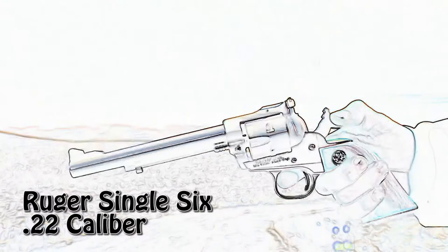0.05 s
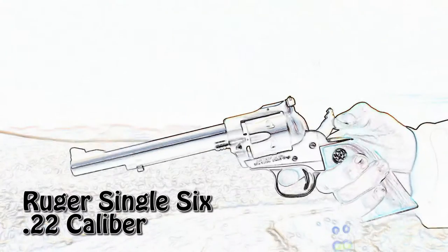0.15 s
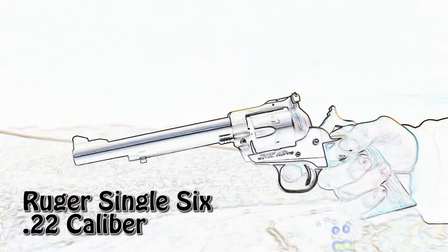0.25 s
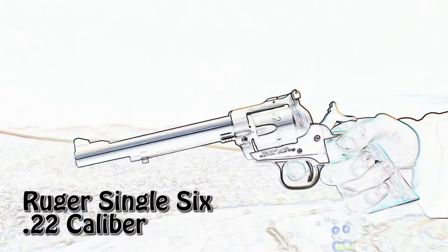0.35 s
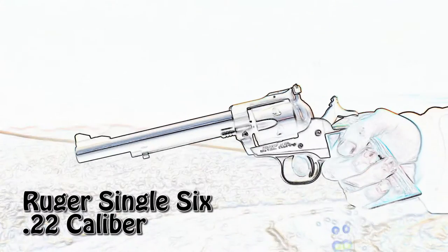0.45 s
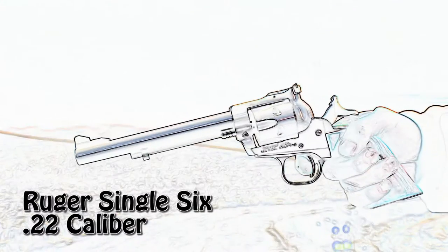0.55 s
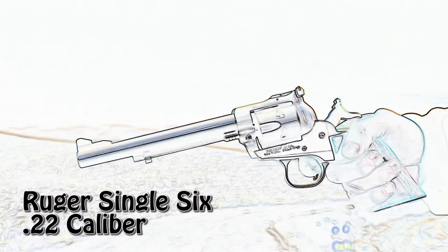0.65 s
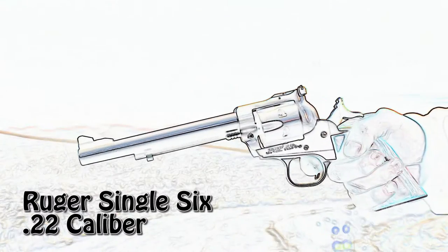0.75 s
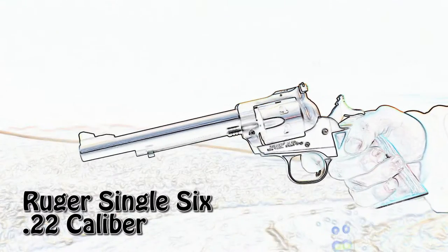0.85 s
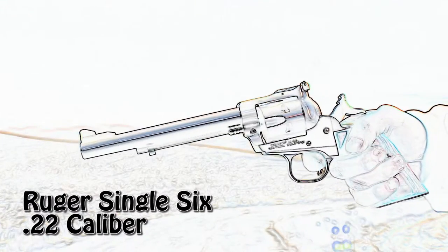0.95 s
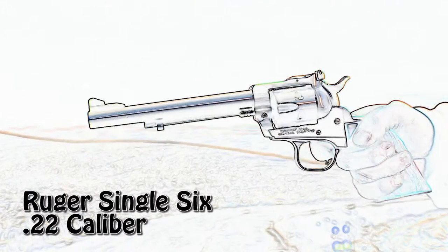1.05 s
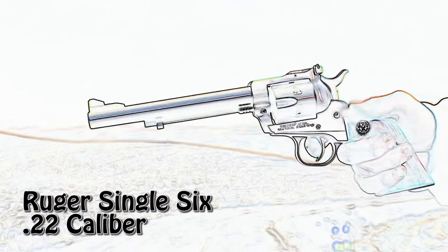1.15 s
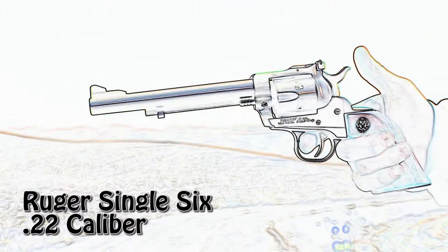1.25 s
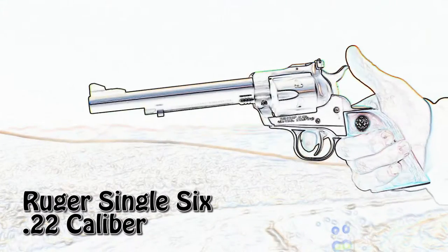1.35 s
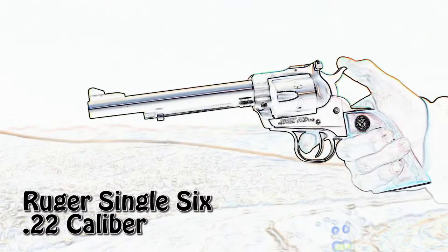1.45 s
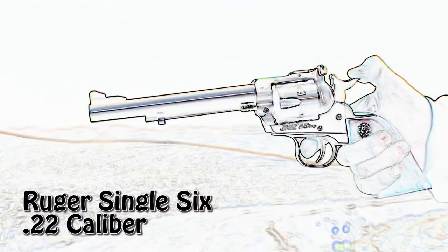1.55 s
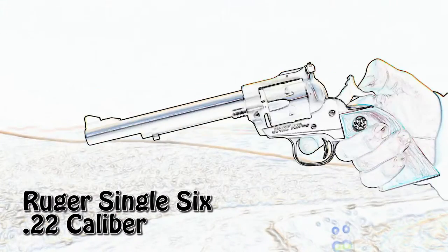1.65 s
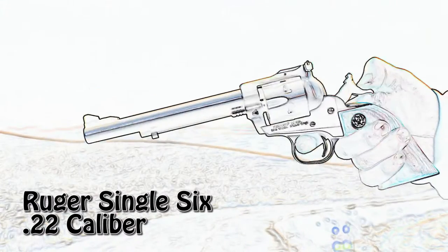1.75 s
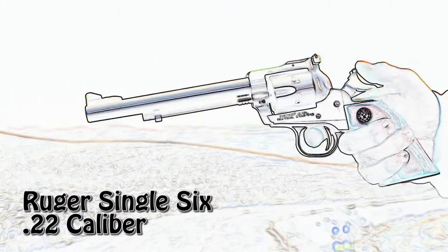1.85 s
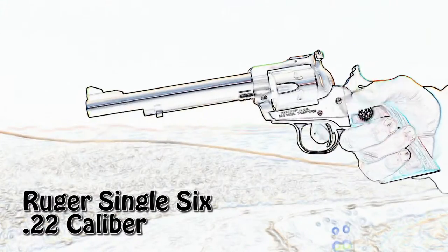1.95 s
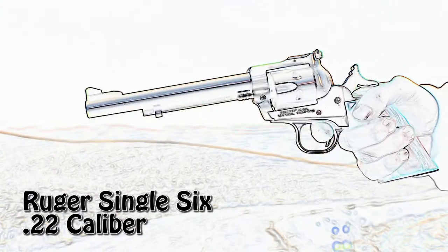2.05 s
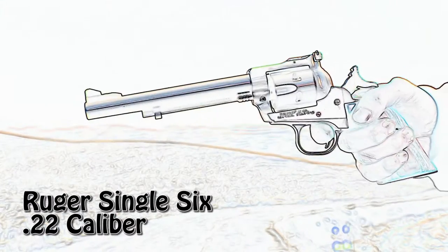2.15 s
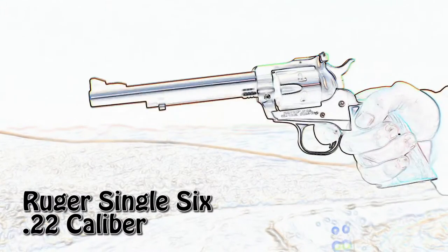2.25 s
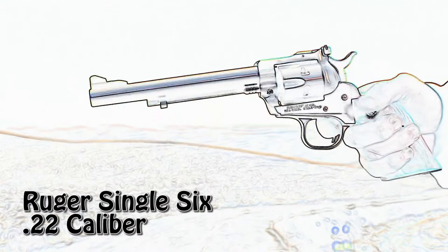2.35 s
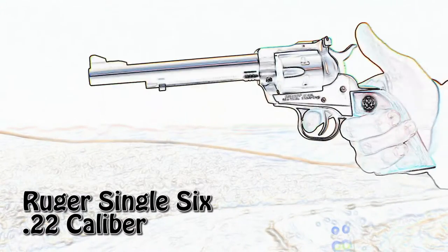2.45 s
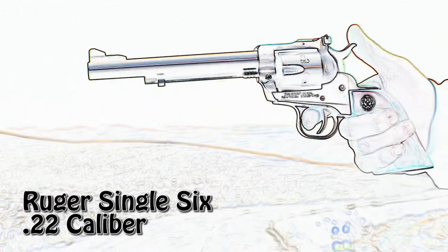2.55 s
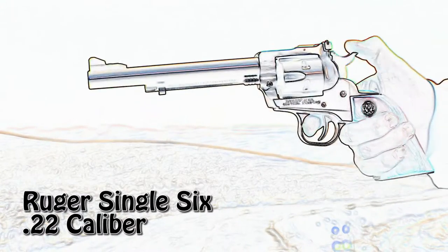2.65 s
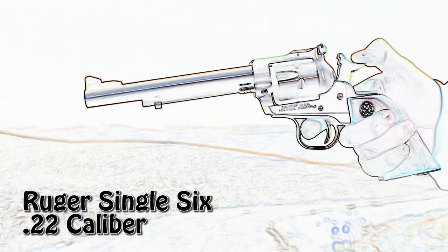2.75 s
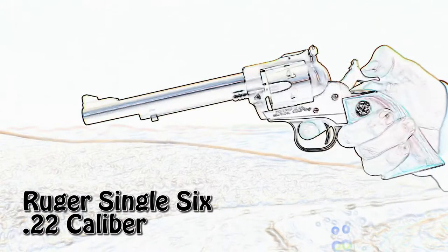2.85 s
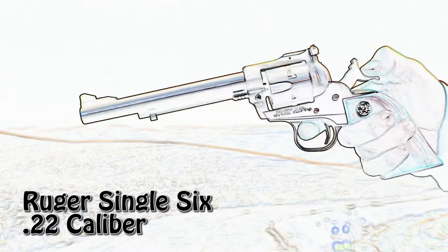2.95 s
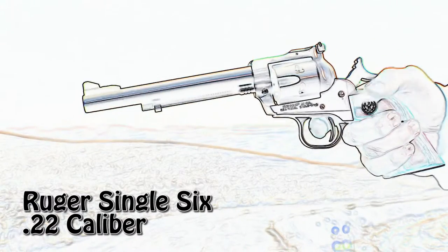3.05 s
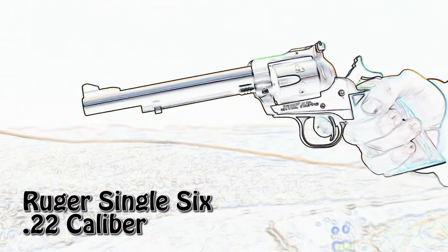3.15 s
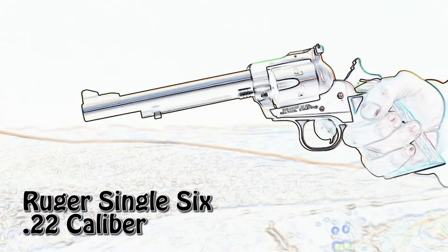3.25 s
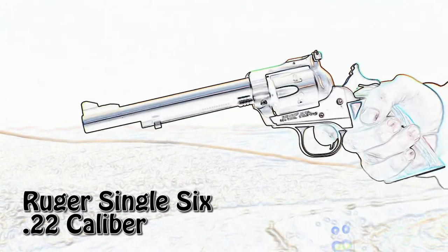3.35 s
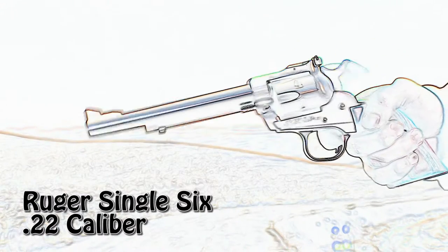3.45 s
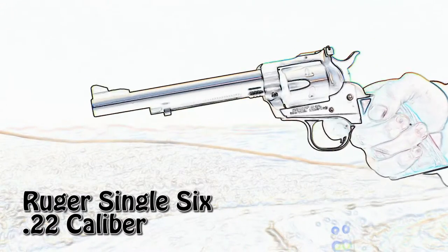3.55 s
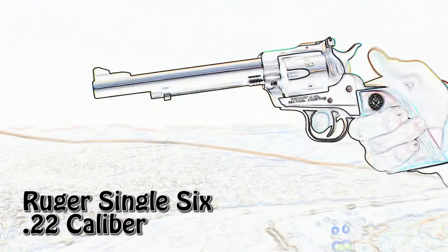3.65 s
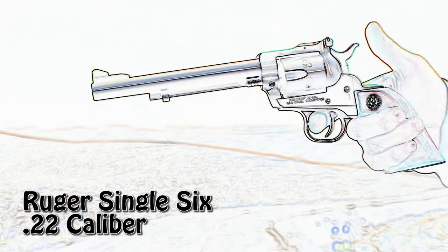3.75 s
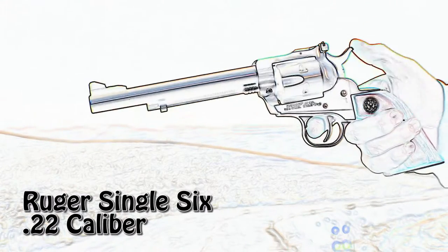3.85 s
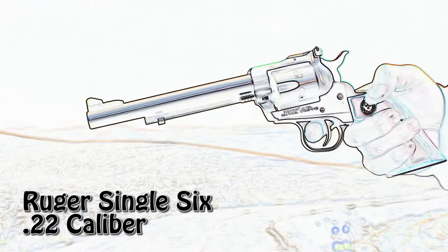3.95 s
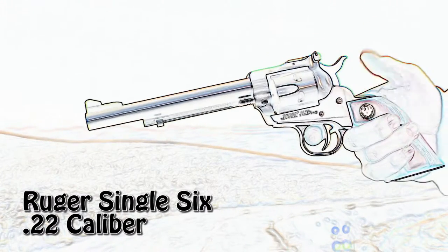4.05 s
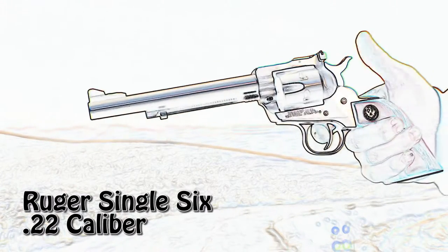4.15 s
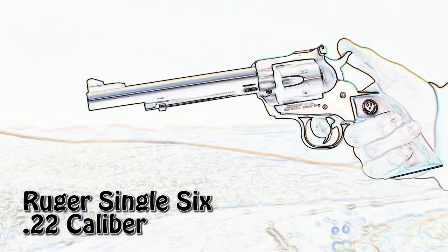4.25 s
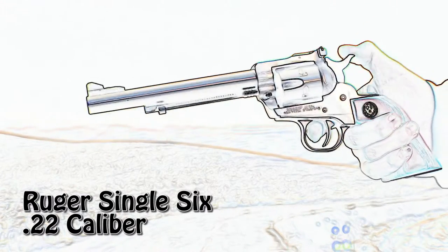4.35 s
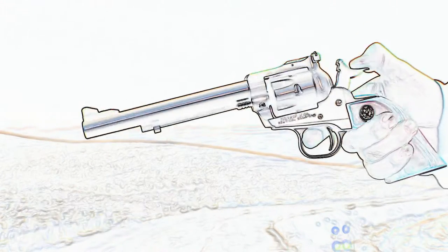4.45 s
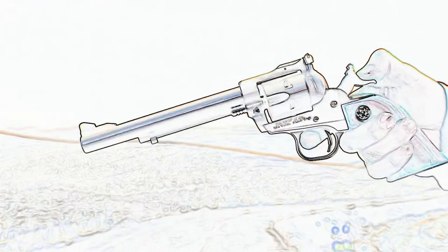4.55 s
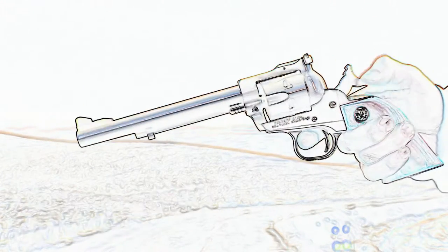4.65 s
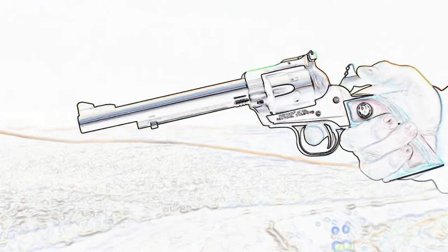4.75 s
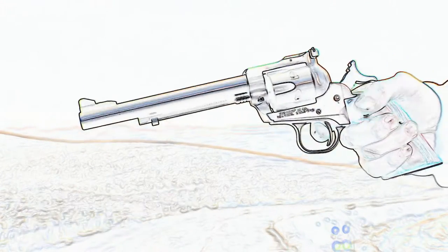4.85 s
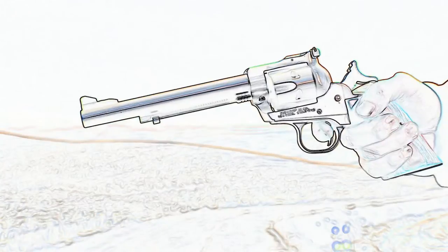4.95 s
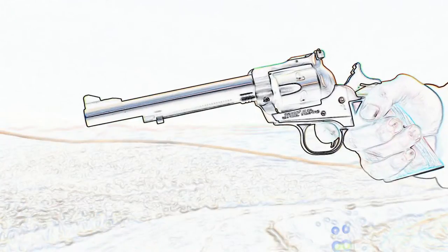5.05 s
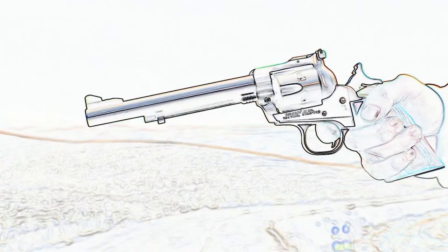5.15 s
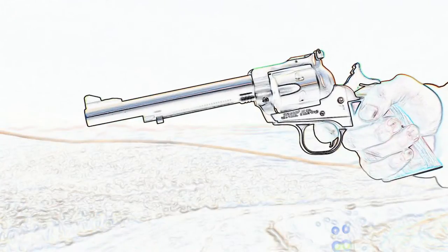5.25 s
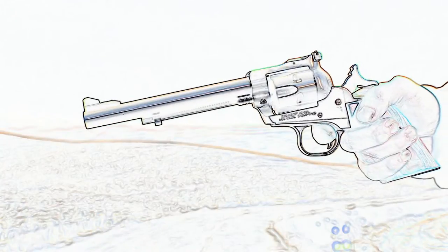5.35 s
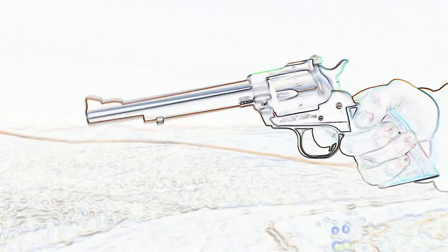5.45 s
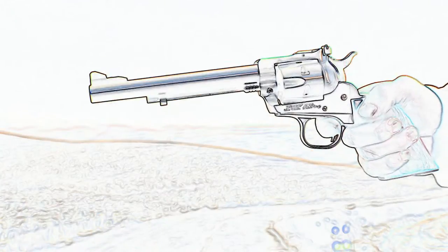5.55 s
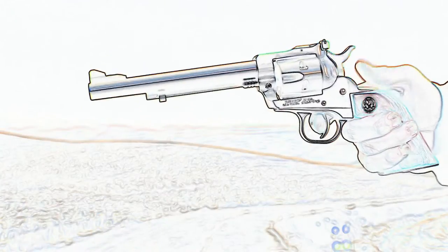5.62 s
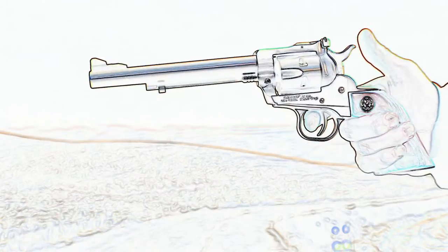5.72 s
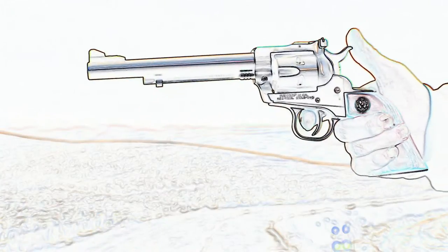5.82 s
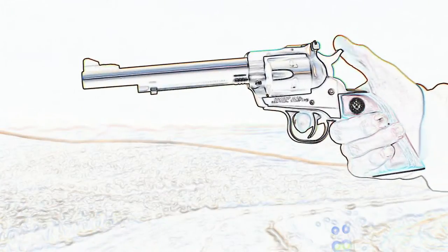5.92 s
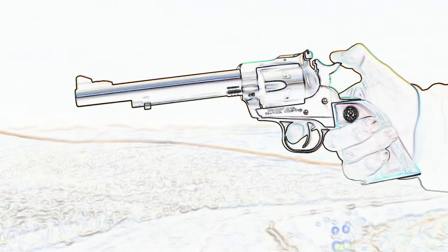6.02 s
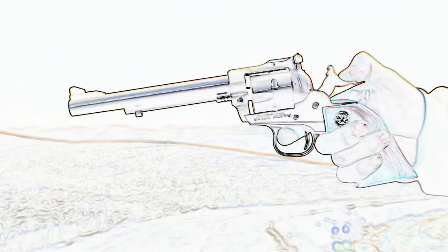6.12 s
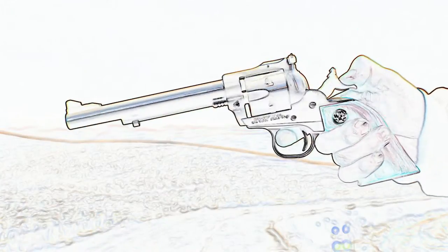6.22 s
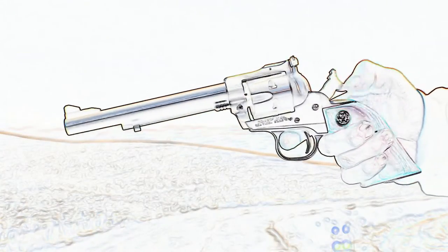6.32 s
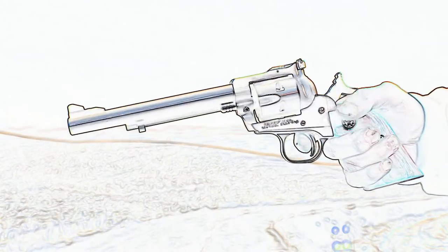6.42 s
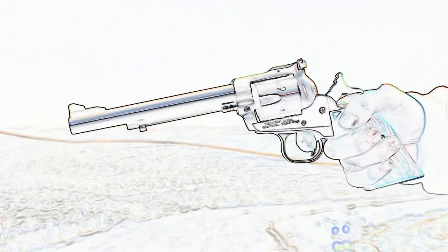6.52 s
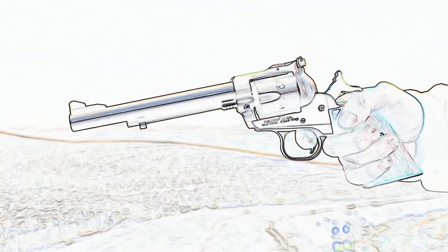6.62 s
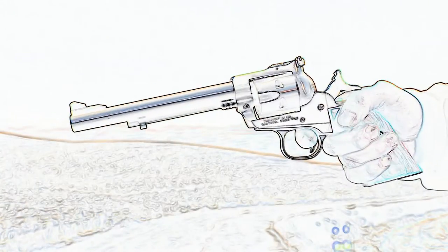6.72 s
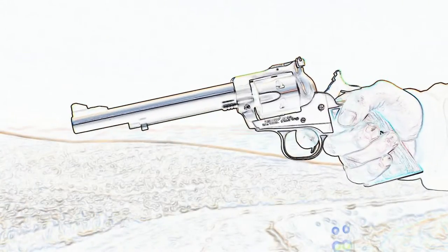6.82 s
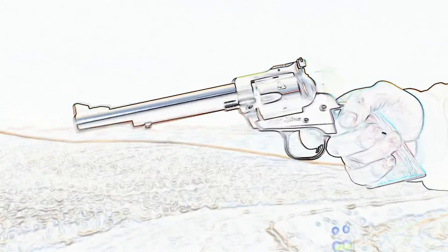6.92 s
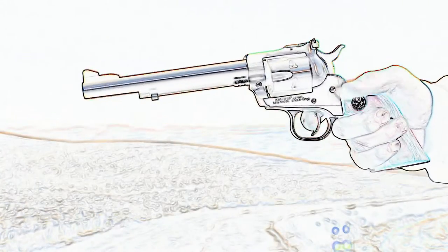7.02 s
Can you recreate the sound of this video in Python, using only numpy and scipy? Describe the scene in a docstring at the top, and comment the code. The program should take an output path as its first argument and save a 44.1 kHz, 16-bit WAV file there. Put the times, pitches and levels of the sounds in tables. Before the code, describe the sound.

A small-bore revolver is cocked and fired five times at an unhurried pace, right by the microphone in open country. Each time the hammer draws back with a crisp steel double click, then a short, sharp crack overloads the microphone, slaps off the ground and rolls faintly back from distant slopes. A light breeze and a few very faint far-off calls lie underneath.

```python
"""A light breeze over open country, and close by the steel clicks of a revolver being cocked.
The small-bore gun is cocked and fired five times, right by the microphone, with faint calls far off.
The lock's parts rub and strike, ringing the frame and cylinder. Each blast of gas overloads the
capsule, slaps back from the ground and rolls in again from far slopes, while the gain control
ducks and recovers."""
import sys
import numpy as np
from scipy import signal
from scipy.io import wavfile
from scipy.ndimage import uniform_filter1d

SR = 44100
rng = np.random.default_rng(int(sys.argv[2]) if len(sys.argv) > 2 else 0)


def wrap_up_sound(samples):
    """Save the sound to the file named by the first command line argument, as 16-bit audio."""
    columns = np.atleast_2d(samples).T
    # keep every value between -1 and 1, then stretch to whole-number steps
    tamed = np.clip(columns, -1, 1)
    steps = np.round(tamed * 32767).astype(np.int16)
    wavfile.write(sys.argv[1], SR, steps)


N = 312213

# breeze and hiss at the microphone: f/Hz, relative density/dB
BREEZE_COLOUR = [(12, -49), (20, -22), (81, 0), (205, -6.5), (295, -2), (390, -10.5), (436, -6.5),
                 (646, -10), (956, -14.5), (1100, -16.5), (1300, -21), (14100, -29), (16200, -54.5)]
# wind buffeting the microphone: t/s, relative level/dB
GUSTS = [(0.0, -67.5), (.7, -63), (1.0, -62.5), (1.5, -61), (2.2, -61), (2.7, -65.5), (3.0, -63.5),
         (3.45, -60.5), (3.86, -65.5), (4.08, -61.5), (4.17, -52.5), (4.5, -62.5), (5.0, -59), (5.45, -62),
         (5.85, -66.5), (6.2, -63), (7.08, -62)]
# breeze across the stereo pair: f/Hz, left-right correlation
BREEZE_LIKENESS = [(60, 0.97), (300, 0.94), (640, 0.86), (1400, 0.061), (3000, 0.032), (16000, 0.15)]
# calls in the distance: t/s, length/s, start f/Hz, end f/Hz, level/dB
FAR_CALLS = [(0.652, 0.071, 1066, 1064, -62), (0.935, .1, 574, 680, -50), (4.648, 0.072, 894, 784, -51),
             (5.129, 0.093, 888, 778, -55.5), (6.29, 0.049, 1010, 970, -51.5),
             (6.467, 0.096, 940, 960, -50.5), (6.765, 0.054, 826, 896, -47.5)]
# modes of the steel frame and cylinder: f/Hz, relative level/dB, t60/s
STEEL_MODES = [(1570, -12, .018), (2300, -38, 0.0054), (2890, -19.5, 0.034), (3255, -6, 0.0099),
               (3624, -6.5, 0.0086), (4760, -6.5, 0.0037), (6300, -6.5, 0.0034), (8020, 7.5, 0.0013),
               (9240, -3, 0.0041), (9870, -13.5, 0.038), (10500, -8, .004), (12700, -16, .003),
               (14520, -28, .003)]
# small ticks of the lock and the released trigger: t/s, level/dB, brightness/dB
LOCK_TICKS = [(.0117, -42.5, -10), (0.0377, -35, -9), (0.0443, -31.5, 2), (0.0563, -38, 18),
              (.1336, -41, 18), (.155, -44, 11), (1.218, -34.5, 27), (1.4364, -44, 3), (1.6648, -32.5, 3),
              (1.6752, -38, 9.5), (1.721, -32.5, -4), (1.885, -33.5, 14), (1.9056, -53, 14),
              (1.914, -46, 10), (2.4354, -38, 16), (2.4603, -32.5, 13), (2.6863, -43, 6), (2.8087, -32, 19),
              (2.8313, -38, 15), (2.9004, -32.5, 7.5), (3.037, -36, 8), (3.691, -37, 20), (3.715, -34, 12),
              (4.4383, -45.5, 19), (4.5131, -38, 5), (4.5225, -38, 6), (4.54, -38, -2), (4.5737, -34, 5.5),
              (4.6046, -39, 9), (4.7465, -32, 13), (5.6444, -41, 13), (5.6752, -37.5, 18), (5.682, -40, 16),
              (6.0912, -38.5, 6), (6.0985, -37, 14), (6.1594, -31.5, -3), (6.3455, -50, -1),
              (6.4002, -48.5, 7), (6.474, -48.5, 14)]
# thumbing the hammer back: draw t/s, first notch t/s, its brightness/dB,
# full cock t/s, its level/dB, settling t/s, its level/dB
COCKINGS = [(.019, .0825, 5, .195, -7.5, .2728, -29), (1.645, 1.7072, 8, 1.7568, -5, 1.8793, -27),
            (2.80, 2.845, 11, 2.9169, -6, 3.0268, -30), (4.496, 4.5545, 14, 4.6294, -5.5, 4.7365, -35),
            (6.087, 6.141, 12, 6.2098, -5, 6.334, -34)]
# slaps off the ground and objects nearby: delay/s, relative level/dB, f/Hz
SLAPS = [(.0180, -14.5, 710.4), (.0225, -15, 1197), (.0328, -14, 1744), (0.0308, -22.5, 4985),
         (.0350, -20.5, 1093), (.051, -24.5, 807.3)]
# scatter from nearby: f/Hz, relative density/dB
SCATTER_COLOUR = [(60, -9.5), (300, -0.5), (500, -5.5), (700, -13.5), (1100, 4.5), (1800, -6.5),
                  (3000, -9.5), (5000, -13.5), (9000, -7), (13000, -13.5), (16000, -27.5)]
# decay of that scatter: f/Hz, t60/s
SCATTER_T60 = [(60, 0.069), (300, 0.15), (1000, 0.13), (2000, 0.19), (4000, 0.16), (8000, 0.1),
               (16000, 0.083)]
# returns from far slopes: delay/s, relative level/dB, spread/s
SLOPES = [(.08, -39.5, 0.035), (.16, -46, .04), (0.258, -41.5, 0.066), (0.428, -43.5, 0.074),
          (.55, -50.5, .06), (.7, -57.5, 0.088)]
# colour of those returns before the treble tilt: f/Hz, relative density/dB
SLOPE_COLOUR = [(300, -28), (700, -12), (1040, -1), (1600, -4.5), (2500, -1), (3400, -9.5), (4400, -15),
                (9500, -23.5), (15500, -40)]
# shots at close range: t/s, drive into overload/dB, echo gain/dB
SHOTS = [(1.0770, 18, 3.5), (2.3139, 18.5, 4), (3.5651, 17.5, 2), (5.5295, 18, 2), (6.953, 19, 3.5)]

HAMMER_PAN_DB, TICK_PAN_DB = -.8, -3  # left against right: the gun is right of centre


def amp(db):
    """Gain of a dB value."""
    return 10 ** (np.asarray(db) / 20)


def read(points, hz):
    """Interpolates a table on a log-frequency axis."""
    f, value = np.transpose(points)
    return np.interp(np.log(hz + 1), np.log(f + 1), value)


def colour(points, hz):
    """A spectrum table in dB, shifted to a mean power of 1."""
    db = read(points, hz)
    return db - 10 * np.log10(np.mean(amp(db) ** 2))


def add(mix, s, sound):
    """Mixes a stereo sound in at second s."""
    part = mix[:, round(s * SR):][:, :sound.shape[1]]
    part += sound[:, :part.shape[1]]


def noise(field_db, likeness, size):
    """Stereo noise shaped by bins-by-frames levels, with a given left-right correlation."""
    a, b, c, d = rng.standard_normal((4,) + field_db.shape)
    likeness = np.clip(likeness, -1, 1)
    left = a + 1j * b
    right = likeness * left + np.sqrt(1 - likeness ** 2) * (c + 1j * d)
    spectra = np.array([left, right]) * amp(field_db)
    return signal.istft(spectra, nperseg=size, noverlap=size * 3 // 4)[1] / np.sqrt(size * 4 / 3)


def band(x, lo_hz, hi_hz):
    """Band-pass."""
    return signal.sosfilt(signal.butter(2, [lo_hz, hi_hz], "band", fs=SR, output="sos"), x)


def breeze(level_db=-45.5):
    """Low wash of wind in drifting patches, buffeting at the bottom, smooth microphone hiss above."""
    hz, s = np.fft.rfftfreq(1024, 1 / SR), np.arange(N // 256 + 5) * 256 / SR
    patches = uniform_filter1d(rng.standard_normal((len(hz), len(s))), 6, axis=0)
    patches = uniform_filter1d(patches, 14, axis=1)
    patches_db = 17 * patches / (1 + (hz[:, None] / 1100) ** 4)
    gusts_db = np.interp(s, *np.transpose(GUSTS))
    gusts_db = (gusts_db - gusts_db.mean()) / (1 + (hz[:, None] / 150) ** 2)
    field_db = level_db + colour(BREEZE_COLOUR, hz)[:, None] + patches_db + gusts_db
    return noise(field_db, read(BREEZE_LIKENESS, hz)[:, None], size=1024)[:, :N]


def far_call(length, start_hz, end_hz, db):
    """A call a long way off: one gliding note with a flickering level."""
    hz = np.linspace(start_hz, end_hz, round(length * SR))
    flicker = 1 + 6 * uniform_filter1d(rng.standard_normal(len(hz)), 300)
    note = np.sin(2 * np.pi * np.cumsum(hz) / SR)
    return amp(db) * flicker * note * np.hanning(len(hz)) * np.ones((2, 1))


def steel(drive, bright_db):
    """Contact rings the steel; brightness is the power of the modes above 4 kHz against those below."""
    t = np.arange(1400) / SR
    modes = [amp(db - 60 * t / t60) * np.sin(2 * np.pi * hz * rng.uniform(.98, 1.02) * t)
             for hz, db, t60 in STEEL_MODES]
    body, treble = sum(modes[:5]), sum(modes[5:])
    treble_share = 1 / (1 + amp(-2 * bright_db))
    ring = np.sqrt(1 - treble_share) * body / np.linalg.norm(body)
    ring += np.sqrt(treble_share) * treble / np.linalg.norm(treble)
    thin = band(band(drive, 1950, 19000), 1950, 19000)  # small parts radiate no bass
    return signal.oaconvolve(thin, ring[None], axes=1)


def rub(length, db):
    """Tiny uneven slips of steel on steel."""
    count, slips_per_s = round(length * SR), 4000
    slips = rng.standard_normal(count) * amp(3.5 * rng.exponential(1, count))
    slips *= rng.random(count) < slips_per_s / SR
    slips *= signal.windows.tukey(count, .3)
    ring = steel(np.array([np.roll(slips, 2), slips]), bright_db=2)
    return amp(db) * ring / np.sqrt(np.mean(ring[:, :count] ** 2))


def click(db, bright_db, pan_db=TICK_PAN_DB, contact_ms=.9):
    """A blow and a brief chattering contact in the lock, then the parts rattle to rest."""
    t = np.arange(1400) / SR
    contact = t / (contact_ms / 1000)
    envelope = np.sqrt(contact) * np.exp(-contact) + .05 * np.exp(-t / .004) + .009 * np.exp(-t / .018)
    chatter = rng.standard_normal((3, len(t))) * envelope  # shared, left, right
    chatter[0, 8] += 2  # the first blow
    pair = np.array([np.roll(chatter[0], 2), chatter[0]]) + .55 * chatter[1:]  # reaches the left later
    ring = steel(pair, bright_db)
    attack_rms = np.sqrt(np.mean(ring[:, :110] ** 2))
    return amp(db) * ring / attack_rms * amp([[pan_db / 2], [-pan_db / 2]])


def cocking(draw, notch, notch_bright_db, full, full_db, settle, settle_db):
    """Rubbing draw, first notch, full cock, then the hammer settles on the sear: (t/s, sound) each."""
    return [(draw, rub(full + .045 - draw, db=-52)),
            (notch, click(-12.5, notch_bright_db, pan_db=HAMMER_PAN_DB, contact_ms=1)),
            (full, click(full_db, bright_db=5.5, pan_db=HAMMER_PAN_DB, contact_ms=.97)),
            (settle - .006, rub(length=.036, db=settle_db - 21)),
            (settle, click(settle_db, bright_db=-3.5, pan_db=HAMMER_PAN_DB, contact_ms=1))]


def far_roll(tilt_db_per_octave=4.5, air_db_per_octave_s=-8.5):
    """The shot rolls back from far slopes; the air dulls the later returns."""
    hz, s = np.fft.rfftfreq(256, 1 / SR), np.arange(600) * 64 / SR
    power = sum(amp(2 * db) * np.exp(-((s - delay) / spread) ** 2) for delay, db, spread in SLOPES)
    octaves = np.log2(np.maximum(hz, 2000) / 2000)[:, None]
    field_db = colour(SLOPE_COLOUR, hz)[:, None] + 10 * np.log10(power + 1e-12)
    field_db += octaves * (tilt_db_per_octave + air_db_per_octave_s * s)
    field_db += 1.7 * uniform_filter1d(rng.standard_normal(len(s)), 6)  # slopes answer one by one
    likeness = read([(500, .48), (3000, .14), (7000, 0)], hz)[:, None]
    roll = noise(field_db, likeness, size=256)
    t = np.arange(roll.shape[1]) / SR
    return roll * np.clip(t / .03, 0, 1) ** 2


def near_slaps(scatter_db=-9.5):
    """The ground and objects near the microphone slap the shot back, in a dying scatter."""
    hz, s = np.fft.rfftfreq(128, 1 / SR), np.arange(500) * 32 / SR
    decay_db = 60 * s / read(SCATTER_T60, hz)[:, None]
    near = noise(scatter_db + colour(SCATTER_COLOUR, hz)[:, None] - decay_db, likeness=.72, size=128)
    t = np.arange(near.shape[1]) / SR
    near *= np.clip((t - .010) / .00039, 0, 1)  # first return after 10 ms
    for delay, db, pitch_hz in SLAPS:
        cycles = np.arange(200) / SR * pitch_hz
        slap = np.exp(-(cycles - 1) ** 2 / .2) * np.sin(2 * np.pi * cycles)
        add(near, delay, amp(db) * slap * np.ones((2, 1)))
    return near


def blast(drive_db):
    """Gas hiss rides the blast wave; this close, the capsule slams between its limits."""
    ms = np.arange(900) / SR * 1000
    gas = .9 * rng.standard_normal(len(ms)) + .45 * rng.standard_normal((2, len(ms)))
    hiss = 2.5 * band(gas, 7000, 11000) * np.exp(-(ms / 3.9) ** 8)
    # faint hiss swells just before the blast
    hiss *= amp(-36 * np.clip(3.7 - ms, 0, 1) - 5 * np.clip(2.7 - ms, 0, 3))
    roar = 1.3 * band(gas, 1200, 3300) * (ms > 3.4) * np.exp(-(ms / 9.9) ** 12)
    push = -9 * np.exp(-((ms - 5.8) / .68) ** 6)
    suction = np.array([[-.3], [.1]]) * (ms > 5) + 1.2 * np.exp(-((ms - 11.3) / 1.8) ** 4)
    suction *= np.exp(-(ms / 13.2) ** 8)
    held = np.clip(amp(drive_db) * (hiss + roar + push + suction), -1, 1)
    drained = signal.lfilter(*signal.butter(1, 155, "high", fs=SR), held)  # coupling drains held peaks
    sensitivity = (.33 + .75 / (1 + (ms / 6) ** 6)) * np.exp(-(ms / 17) ** 4)
    return drained * sensitivity


def scene():
    """Open country from one spot: breeze all round, calls far off, the revolver close by."""
    mix = breeze()
    for s, drive_db, echo_db in SHOTS:
        add(mix, s, blast(drive_db))
        add(mix, s, amp(echo_db) * near_slaps())
        add(mix, s, amp(echo_db) * far_roll())
    for row in COCKINGS:
        for s, sound in cocking(*row):
            add(mix, s, sound)
    for s, db, bright_db in LOCK_TICKS:
        add(mix, s, click(db, bright_db))
    for s, *call in FAR_CALLS:
        add(mix, s, far_call(*call))
    for when, strength in rng.random((14, 2)):  # the hand shifts on the gun
        add(mix, when * N / SR, click(db=-58 + 7 * strength, bright_db=16))
    return mix


def record(dry, threshold_db=-16.5, release_db_per_s=32.5):
    """Gain control ducks after each shot, the bass most; then the converter's ceiling and band limit."""
    power = uniform_filter1d((dry ** 2).mean(0), 800, origin=399)
    power_db = 10 * np.log10(abs(power) + 1e-12)
    fall_db = np.arange(N) * release_db_per_s / SR
    held_db = np.maximum.accumulate(power_db + fall_db) - fall_db
    over_db = uniform_filter1d(np.maximum(held_db - threshold_db, 0), 1600, origin=799)
    mic = signal.lfilter(*signal.butter(2, 45, "high", fs=SR), dry)  # microphone roll-off
    bass = signal.sosfiltfilt(signal.butter(2, 150, fs=SR, output="sos"), mic)
    ducked = (mic - bass) / amp(.3 * over_db) + bass / amp(2.3 * over_db)
    band_limit = signal.firwin(511, 16400, window=("kaiser", 9), fs=SR)
    return signal.oaconvolve(np.clip(ducked, -.95, .95), band_limit[None], "same")


dry = scene()
out = record(dry)
wrap_up_sound(out)
```